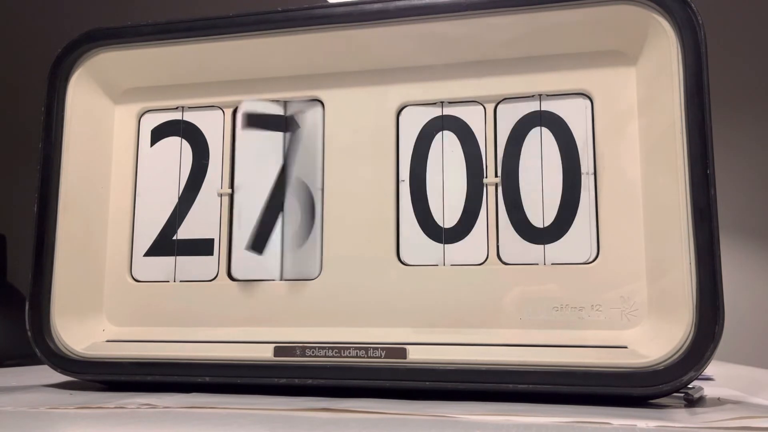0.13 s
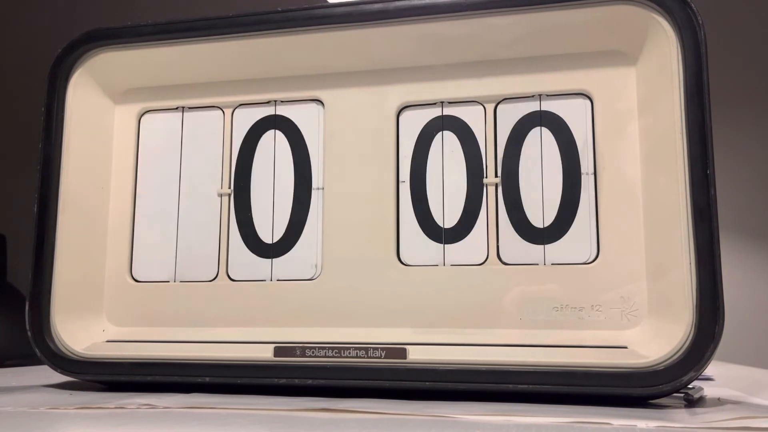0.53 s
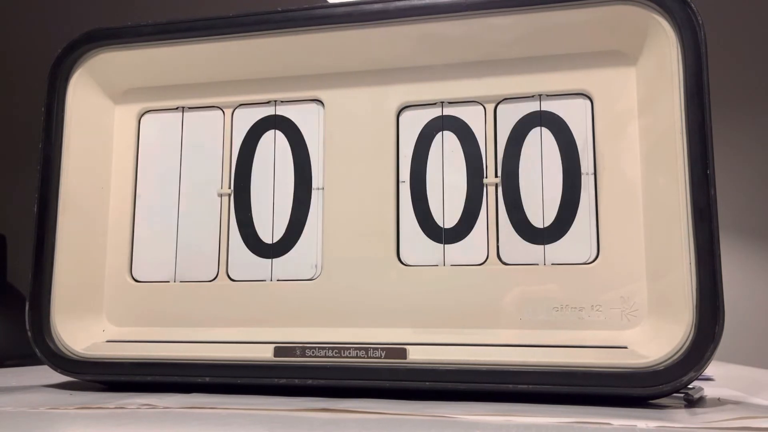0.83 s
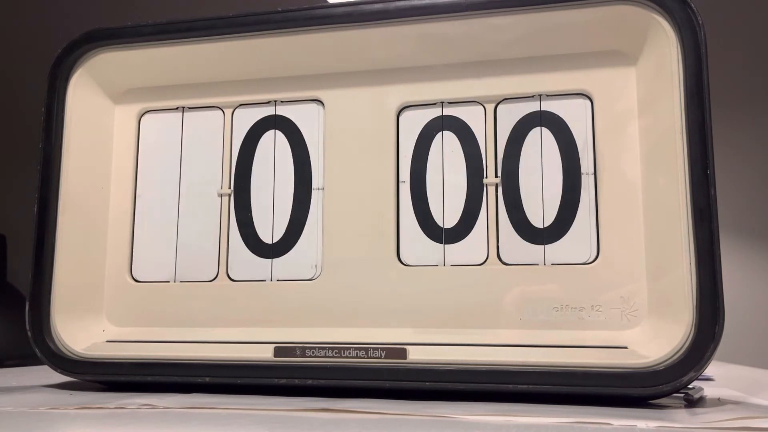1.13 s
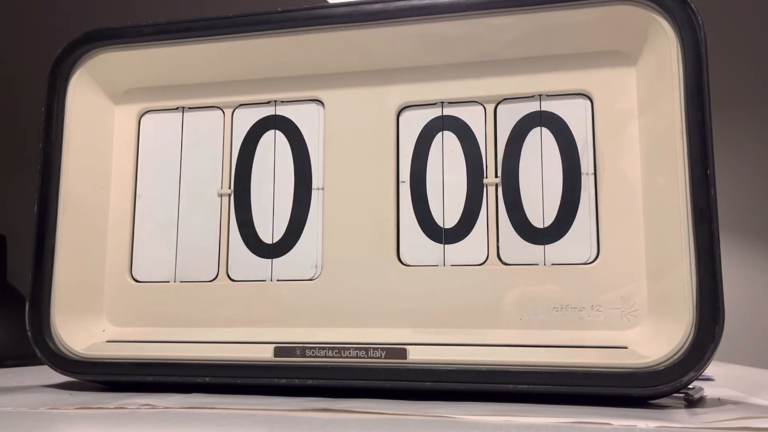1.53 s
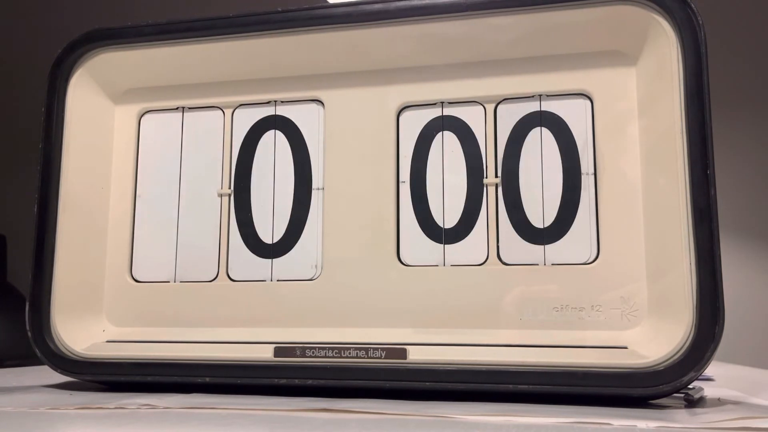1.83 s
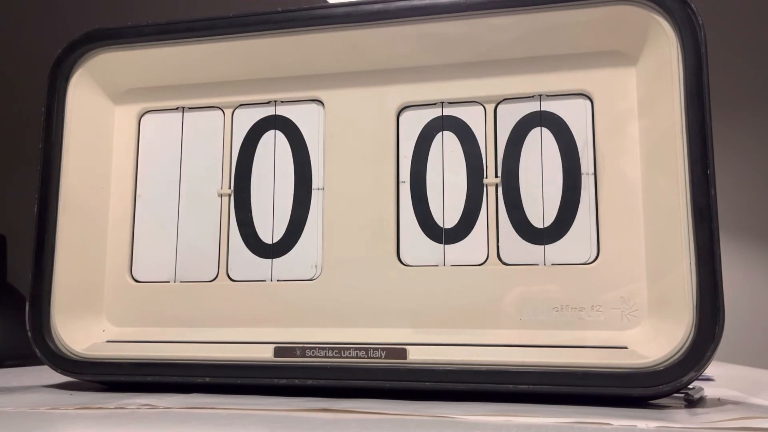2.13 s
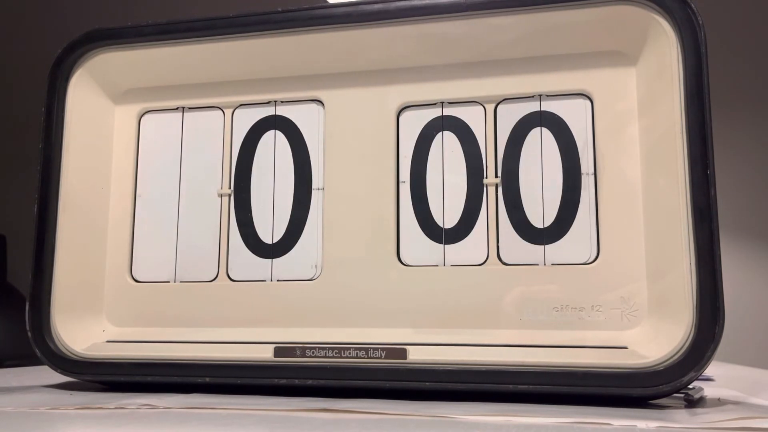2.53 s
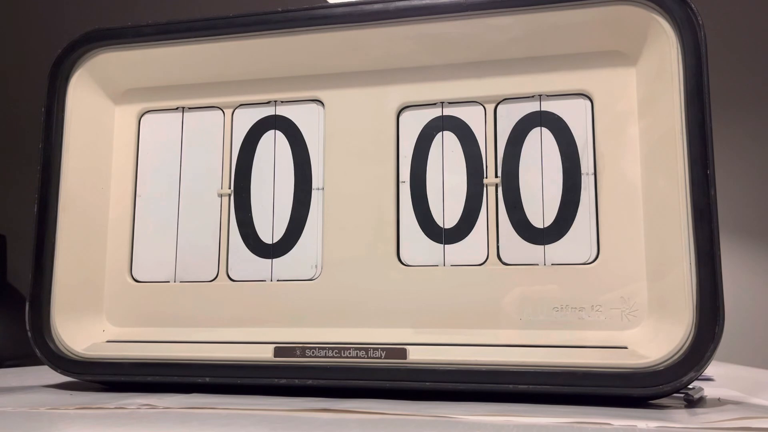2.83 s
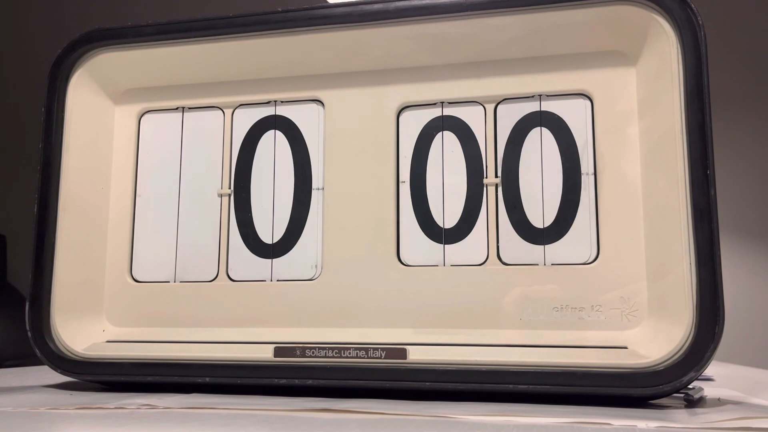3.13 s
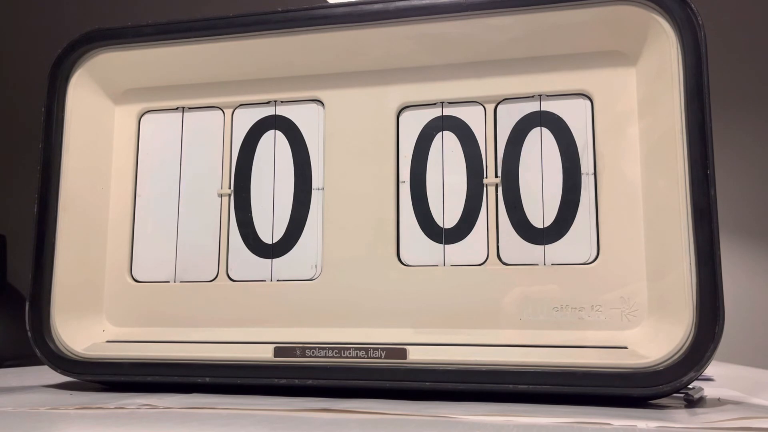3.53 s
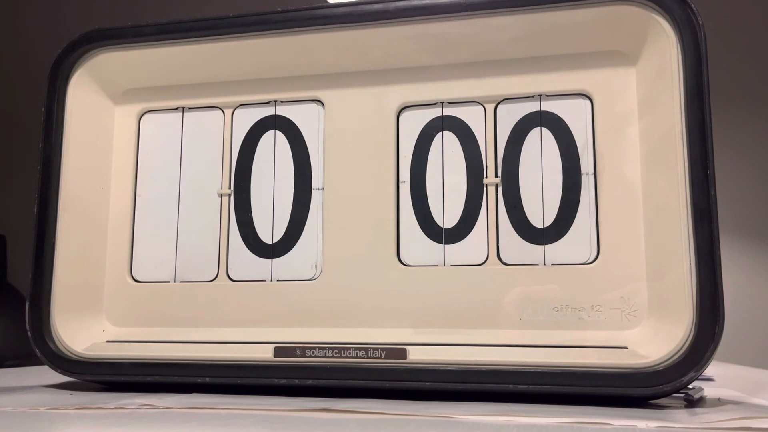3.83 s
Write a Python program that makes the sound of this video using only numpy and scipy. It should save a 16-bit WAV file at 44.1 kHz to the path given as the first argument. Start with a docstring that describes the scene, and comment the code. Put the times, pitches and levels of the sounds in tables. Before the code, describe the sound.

Flip clock flaps clatter from the very start, loud, dense slaps with bright rattle, papery rustle and hollow case thumps, strongest until about 0.25 s, weakening to 0.45 s, with a last faint click near 0.5 s. The short room echo dies away. From 0.6 s to the end at 4 s, much quieter hollow ticks alternate evenly, five a second, over faint fading hum, low rumble and slight hiss. Close stereo microphone.

```python
"""Stiff flaps of a flip clock slap down and rattle, then its escapement ticks five times a second.
Each landing and its bounces are impulses played through a slap, a room echo and ringing parts;
a push sounds the hollow case, close modes ring in each flap, and grains of noise make a rustle.
Each tick is an unlocking and a landing through modes and a hollow echo.
Under it lie a faint, fading hum of sines and a low rumble and hiss of shaped noise."""
import sys
import numpy as np
from scipy import signal
from scipy.fft import rfft, irfft
from scipy.io import wavfile
from scipy.ndimage import uniform_filter1d

SR = 44100
rng = np.random.default_rng(int(sys.argv[2]) if len(sys.argv) > 2 else 0)


def generate_wav(sig):
    """Save sig (samples, or channels by samples) to the path in sys.argv[1] as 16-bit PCM at SR."""
    pcm = np.round(np.clip(np.atleast_2d(sig).T, -1, 1) * 32767).astype(np.int16)
    wavfile.write(sys.argv[1], SR, pcm)


N = 176400
LEAD_IN_S = .1  # room for contacts before time zero
PAD = int(LEAD_IN_S * SR)
AGE_S = np.arange(N + PAD) / SR

# Flap landings. Each row: start in seconds, strength in dB, extra treble in dB,
# push on the case in dB, pitch of the flap's ring in Hz.
LANDINGS = [(-.02, 4, -13, -2, 3400), (.003, 1, -15, -4.5, 3600), (.024, 2.5, -5, -3.5, 4400),
            (.035, 2, -20, -3, 3600), (.071, -1.5, 4, -2.5, 3050), (.085, -7.5, 2.5, 5.5, 3450),
            (.116, -4, 4.5, -3, 4200), (.129, 0.5, -5, 2.5, 3300), (.151, -8, 4, 6, 3900),
            (.164, -2, -10.5, -9.5, 3550), (.184, -4, 5, -3.5, 3000), (.197, -2.5, -3, -5.5, 4500),
            (.212, -3, -9, 0.5, 3500), (.229, -3.5, 0.5, -3.5, 3700), (0.244, -11, -3, -6, 4100),
            (.279, -6, -13, -2.5, 3800), (.297, -6.5, -15.5, -12, 3300), (0.32, -16.5, 7.5, -19.5, 3300),
            (.365, -11.5, 0.5, -12, 3700), (.389, -10, -1.5, -10.5, 3600), (.399, -11.5, -6.5, -10, 3200),
            (.415, -12.5, -18, -8.5, 3500), (.454, -35, -7, -10.5, 3500), (.525, -21, -11.5, -19.5, 3500)]
# Slap colour. Each row: frequency in Hz, relative density in dB per Hz.
SLAP_COLOUR = [(50, -15), (150, 4.5), (320, 1), (540, -2.5), (1000, 2), (1300, 0), (1900, -8.5),
               (2450, -14), (3000, -9.5), (4300, -9.5), (6500, -18), (8200, -26), (10000, -21),
               (14500, -26.5)]
SLAP_DB, SLAP_T60_S, SLAP_RISE_S, SLAP_SPREAD_DB = -2.9, 0.05146, 0.0024, 1
TREBLE_HZ = 2400  # split between body and treble of a contact
BOUNCES_PER_S, BOUNCE_DB, BOUNCE_DECAY_S = 260, -7.5, 0.014
# Room decay. Each row: frequency in Hz, t60 in seconds.
ROOM_DECAY = [(100, .21), (500, .52), (2000, 0.38), (4000, .52), (9000, .26)]
ROOM_DB, ROOM_RISE_S = -4, 0.01
# Ringing parts of the clock. Each row: frequency in Hz, level in dB per unit blow, t60 in seconds.
PART_MODES = [(315.4, -48, 0.3), (393, -51, .4), (428.6, -48.5, .35), (568, -43, .4), (820, -56.5, 0.96),
              (868, -54.5, 0.4), (1041, -57, 0.46), (1370, -56, .55), (1762, -58, .5)]
PART_DETUNE = .008  # scatter as a share of the pitch
# Low modes of the hollow case. Each row: frequency in Hz, level in dB per unit push, t60 in seconds.
CASE_MODES = [(60.83, -46.5, 0.22), (89.7, -31.5, 0.16), (130, -37, 0.3), (166, -45, 0.52),
              (274.4, -48, .2)]
CASE_LOW_HZ = 47.3  # the pushes on the case are cut below this
# Flap ring: level of each close mode, decay, scatter as a share of the pitch
BEND_DB, BEND_T60_S, BEND_SCATTER = -37.5, .14, .06
# Rustle colour. Each row: frequency in Hz, relative density in dB per Hz.
RUSTLE_TINT = [(800, -24.5), (3500, -5), (6200, 3.5), (8200, -10), (9500, 2.5), (13500, -4.5)]
RUSTLE_DB, GRAINS_PER_S, RUSTLE_T60_S, RUSTLE_RISE_S = -37.5, 11000, 0.27, 0.0085
# Hum tones. Each row: frequency in Hz, level in dB relative to HUM_DB at 1 s, fall in dB per second.
HUM_TONES = [(116.6, 0, 4.5), (141, -7.5, 3.5), (200.5, -15, 2), (706, -21, 3)]
HUM_DB, HUM_WAVER_DB, HUM_WANDER_CYCLES = -62, 3, .12
WAVER_PER_S = 14  # fresh random values per second, for hum and rumble
# Rumble and hiss. Each row: frequency in Hz, relative density in dB per Hz.
AIR_COLOUR = [(20, -25.5), (45, -3.5), (80, 3.5), (110, 3.5), (170, -4), (260, -3), (400, -10.5),
              (520, -18), (1000, -26), (2000, -37), (5000, -41), (8000, -47)]
AIR_DB, AIR_FALL_DB_PER_S, RUMBLE_WAVER_DB = -63.5, 1.92, 2.1
# Escapement beats, tick and tock in turn. Each row: start in seconds, unlocking in dB, landing in dB.
TICKS = [(.601, -9, 4), (0.797, -0.5, -9.5), (0.999, -11, -1), (1.197, -3, -7), (1.400, -6, -1),
         (1.598, -4.5, -11.5), (1.799, -11, -3), (2, -7.5, -2.5), (2.199, -8, -1.5), (2.399, -2.5, -6),
         (2.599, -10, -2), (2.800, -7.5, -4), (3.000, -6, 1), (3.197, 0, -12), (3.400, -6, -0.5),
         (3.599, -2, -15), (3.799, -7.5, 2), (3.996, -3.5, -10)]
LANDING_DELAY_S, UNLOCK_SOFT_HZ, TICK_RISE_S = .006, 2080, 0.0006
# Modes struck by the escapement. Each row: frequency in Hz, level in dB before scatter, t60 in seconds.
ESCAPEMENT_MODES = [(610.6, -61, 0.15), (779, -69, 0.076), (1240, -67.5, 0.2), (1467.5, -69.5, 0.075),
                    (1892, -55, 0.016), (1977, -63.5, 0.032), (2526, -81, 0.011), (3712, -71.5, 0.024),
                    (4457, -74.5, 0.015)]
TICK_DETUNE, TICK_SPREAD_DB = .02, 1  # scatter: share of the pitch, level
# Hollow echo in the case. Each row: frequency in Hz, relative density in dB per Hz.
HOLLOW_COLOUR = [(200, -3.5), (480, -1), (620, -6.5), (810, 1), (1000, -6), (1270, -1), (1400, -3),
                 (1600, -14), (2000, -17), (2250, -32), (4200, -40), (7000, -47)]
HOLLOW_DB, HOLLOW_T60_S, HOLLOW_RISE_S = -37, 0.15, .008
TOCK_RING_DB, TOCK_ECHO_T60_S = -3, .22  # ring against the tick's; longer echo
# Left level over right. Each row: frequency in Hz, difference in dB.
SIDE_BALANCE = [(680, 2.2), (1240, -2.5), (2260, 1.47), (4150, 3.96), (7600, 1.48), (13900, 0.08)]
# Left phase against right. Each row: frequency in Hz, phase in radians (negative: left lags).
SIDE_PHASE = [(600, 0), (1250, -2.6), (1900, -6.1), (4700, -5.8), (6800, -7.6), (9500, -10.1),
              (11000, -12.4), (13000, -13.6)]
# Diffuse share of the noise between left and right. Each row: frequency in Hz, share from 0 to 1.
DIFFUSE_SHARE = [(80, .02), (250, .09), (600, .3), (1500, .35), (4000, .3), (10000, .12)]
TOP_HZ = 14100


def undb(db):
    """Decibels to gain."""
    return 10 ** (np.asarray(db) / 20)


def at(points, hz):
    """Read a table on a log-frequency axis."""
    f, v = np.array(points, float).T
    return np.interp(np.log(np.maximum(hz, 1)), np.log(f), v)


def freqs(x):
    """Frequencies of a signal's spectrum."""
    return np.fft.rfftfreq(x.shape[-1], 1 / SR)


def colour(x, points):
    """Filter by a table of Hz and dB."""
    return irfft(rfft(x) * undb(at(points, freqs(x))), x.shape[-1])


def soften(x, hz):
    """Second-order low-pass."""
    return signal.sosfilt(signal.butter(2, min(hz, SR / 4), fs=SR, output="sos"), x + 1e-18)


def cut_below(x, hz):
    """Second-order high-pass."""
    return signal.sosfilt(signal.butter(2, hz, "high", fs=SR, output="sos"), x + 1e-18)


def t60_fade(t, t60_s):
    """Exponential decay that falls 60 dB in t60_s."""
    return np.exp(-np.log(1000) * t / t60_s)


def noise(size):
    """Stereo noise: a common part and a diffuse part, shared out by frequency."""
    spectra = rfft(rng.standard_normal((3, size)))
    hz = np.fft.rfftfreq(size, 1 / SR)
    share = np.clip(at(DIFFUSE_SHARE, hz), 0, 1)
    return irfft(spectra[0] * np.sqrt(1 - share) + spectra[1:] * np.sqrt(share), size)


def waver():
    """Slow random swing with a spread a little under 1."""
    k = int(SR / max(WAVER_PER_S, 1))
    return uniform_filter1d(np.repeat(rng.standard_normal(N // k + 1), k), k)[:N]


def dense_ring(points, t60, rise_s):
    """Many close modes as decaying noise of unit energy; t60 is seconds or a table."""
    t, white, out = AGE_S[:SR // 2], noise(SR // 2), 0
    f, spectrum = freqs(white), rfft(white)
    rise = 1 - np.exp(-(t / rise_s) ** 2)
    for hz in 31.25 * 2 ** np.arange(10):  # overlapping octave bands
        window = np.maximum(0, 1 - np.abs(np.log2(np.maximum(f, 1) / hz)))
        decay_s = t60 if np.isscalar(t60) else at(t60, hz)
        band = irfft(spectrum * window, len(t)) * t60_fade(t, decay_s) * rise
        out = out + band * np.sqrt(hz / np.sum(band ** 2))  # equal energy per Hz
    out = colour(np.pad(out, ((0, 0), (0, len(t)))), points)[:, :len(t)]
    return out / np.sqrt(np.sum(out ** 2) / 2)


def modes(table):
    """A few decaying sines, alternate in sign."""
    t, out = AGE_S[:SR], 0
    for k, (hz, db, t60_s) in enumerate(table):
        out = out + (-1) ** k * undb(db) * np.sin(2 * np.pi * hz * t) * t60_fade(t, t60_s)
    return out[None]


def detuned(table, share, spread_db):
    """The same modes, scattered in pitch and level."""
    return [(hz * (1 + share * rng.standard_normal()), db + spread_db * rng.standard_normal(), t60_s)
            for hz, db, t60_s in table]


def blows(times_s, db):
    """One impulse for each contact."""
    out = np.zeros(len(AGE_S))
    index = np.round(np.asarray(times_s) * SR).astype(int) + PAD
    inside = (index >= 0) & (index < len(out))
    np.add.at(out, index[inside], undb(db)[inside])
    return out


def excite(force, response):
    """Play a force through a response by convolution."""
    return signal.fftconvolve(force[None], response, axes=1)[:, PAD:PAD + N]


def rattle(rows, count=14):
    """Contact force of flaps that land and then bounce ever more weakly."""
    start_s, db, treble_db, _, _ = np.array(rows).T[:, :, None]
    lag_s = np.cumsum(rng.uniform(.2, 1.8, (len(rows), count)), axis=1) / BOUNCES_PER_S
    lag_s[:, 0] = 0  # the landing itself
    contact_s = start_s + lag_s
    contact_db = db + (lag_s > 0) * BOUNCE_DB + 20 * np.log10(np.exp(-lag_s / BOUNCE_DECAY_S))

    def force(level_db):
        """Contacts push forward and back in turn."""
        return blows(contact_s[:, ::2], level_db[:, ::2]) - blows(contact_s[:, 1::2], level_db[:, 1::2])

    body = soften(force(contact_db), TREBLE_HZ)
    treble = cut_below(force(contact_db + treble_db), TREBLE_HZ)
    return body - treble  # opposite signs join smoothly at the split


def case_boom():
    """Each landing pushes the hollow case, which booms in its low modes."""
    start_s, _, _, push_db, _ = np.array(LANDINGS).T
    return excite(cut_below(blows(start_s, push_db), CASE_LOW_HZ), modes(CASE_MODES))


def flaps(count=6):
    """Groups of flaps excite a tinted slap, a room echo and detuned ringing parts."""
    out = 0
    for k in range(count):
        contacts = rattle(LANDINGS[k::count])
        tint = [(hz, db + SLAP_SPREAD_DB * rng.standard_normal()) for hz, db in SLAP_COLOUR]
        slap = dense_ring(tint, SLAP_T60_S, SLAP_RISE_S) * undb(SLAP_DB)
        echo = dense_ring(SLAP_COLOUR, ROOM_DECAY, ROOM_RISE_S) * undb(ROOM_DB)
        parts = modes(detuned(PART_MODES, PART_DETUNE, 0))
        out = out + excite(contacts, slap + echo) + excite(contacts, parts)
    return out


def bending():
    """Each stiff flap rings briefly in a cluster of close modes round its own pitch."""
    out, t = np.zeros((2, len(AGE_S) + SR)), AGE_S[:SR // 3]
    fade = (1 - np.exp(-t / SLAP_RISE_S)) * t60_fade(t, BEND_T60_S)
    for start_s, db, treble_db, _, hz in LANDINGS:
        detune, phase, side_phase = rng.standard_normal((3, 8, 1))  # eight modes
        angle = 2 * np.pi * (hz * (1 + BEND_SCATTER * detune) * t + phase)
        ring = np.array([np.sin(angle + side * side_phase).sum(axis=0) for side in (.5, -.5)])
        i = max(int(start_s * SR) + PAD, 0)
        out[:, i:i + len(t)] += ring * fade * undb(db + treble_db + BEND_DB)
    return out[:, PAD:PAD + N]


def rustle():
    """Dense tiny slips as landed flaps brush their neighbours; strong, bright landings rustle most."""
    start_s, db, treble_db, _, _ = np.array(LANDINGS).T
    t = AGE_S[:SR]
    fade = (1 - np.exp(-t / RUSTLE_RISE_S)) * t60_fade(t, RUSTLE_T60_S)
    power = excite(blows(start_s, db + treble_db) ** 2, fade[None] ** 2)
    grains = (rng.random(N) < GRAINS_PER_S / SR) * rng.exponential(1, N)
    slips = .5 + 8 * uniform_filter1d(grains, size=8)
    x = colour(noise(N) * slips, RUSTLE_TINT)
    return x / x.std() * np.sqrt(np.abs(power)) * undb(RUSTLE_DB)


def hum():
    """Faint sines that waver in level and phase while they fade."""
    t, out = AGE_S[:N], 0
    for hz, db, fall_db_per_s in HUM_TONES:
        level_db = HUM_DB + db - fall_db_per_s * (t - 1) + HUM_WAVER_DB * waver()
        cycles = hz * t + rng.random() + HUM_WANDER_CYCLES * waver()
        out = out + undb(level_db) * np.sin(2 * np.pi * cycles)
    return out


def air():
    """Shaped noise: low rumble that wavers and falls steadily in level, under a steady faint hiss."""
    x = colour(noise(N), AIR_COLOUR)
    x = x / x.std() * undb(AIR_DB)
    rumble = irfft(rfft(x) / (1 + (freqs(x) / 900) ** 2), N)
    hiss = x - rumble
    return hiss + rumble * undb(RUMBLE_WAVER_DB * waver() - AIR_FALL_DB_PER_S * AGE_S[:N])


def escapement(count=8):
    """Soft unlocking, sharper landing; each tooth's modes and case echo differ, and tocks are duller."""
    out = 0
    for k in range(count):
        start_s, unlock_db, landing_db = np.array(TICKS[k::count]).T
        ring_db, echo_t60_s = (TOCK_RING_DB, TOCK_ECHO_T60_S) if k % 2 else (0, HOLLOW_T60_S)
        unlocking = soften(blows(start_s, unlock_db), UNLOCK_SOFT_HZ)
        landing = blows(start_s + LANDING_DELAY_S, landing_db)
        rise = 1 - np.exp(-AGE_S[:SR] / TICK_RISE_S)
        ring = modes(detuned(ESCAPEMENT_MODES, TICK_DETUNE, TICK_SPREAD_DB)) * rise * undb(ring_db)
        hollow = dense_ring(HOLLOW_COLOUR, echo_t60_s, HOLLOW_RISE_S) * undb(HOLLOW_DB)
        out = out + excite(unlocking + landing, ring[:, :hollow.shape[1]] + hollow)
    return out


def scene():
    """Sum the sources; left and right differ by a few dB, and in phase by up to about two turns."""
    x = case_boom() + flaps() + bending() + rustle() + hum() + air() + escapement()
    x = np.pad(x, ((0, 0), (0, PAD)))
    f, side = freqs(x), np.array([[.5], [-.5]])
    sides = undb(side * at(SIDE_BALANCE, f)) * np.exp(1j * side * at(SIDE_PHASE, f))
    return irfft(rfft(x) * sides, x.shape[-1])[:, :N]


def record(dry):
    """The recorder cuts the top with a steep elliptic low-pass."""
    return signal.sosfilt(signal.ellip(8, .2, 70, TOP_HZ, fs=SR, output="sos"), dry)


dry = scene()
out = record(dry)
generate_wav(out)
```